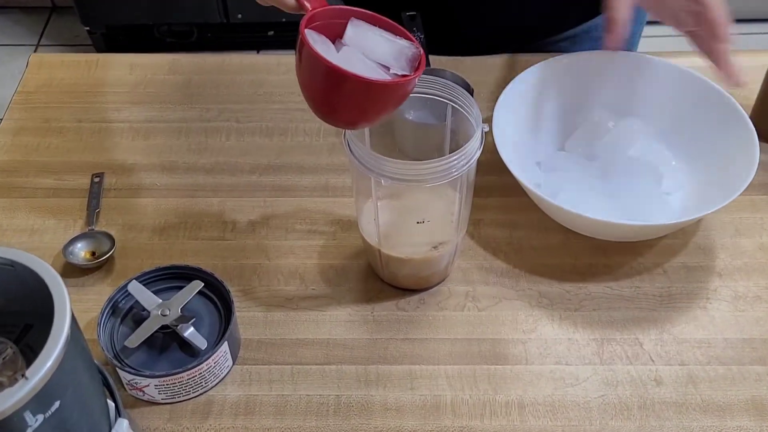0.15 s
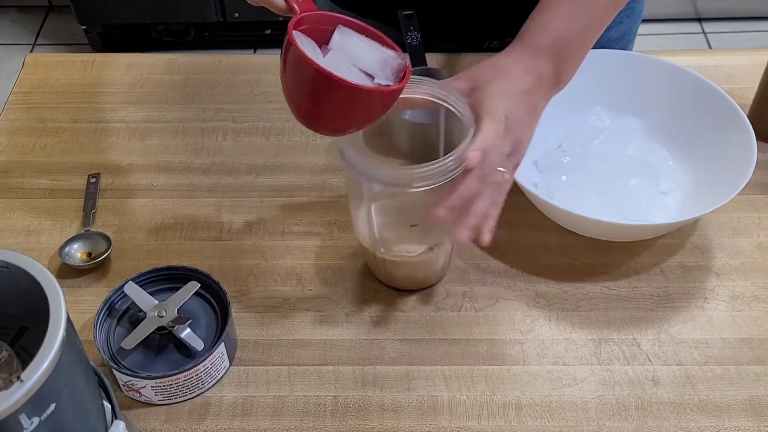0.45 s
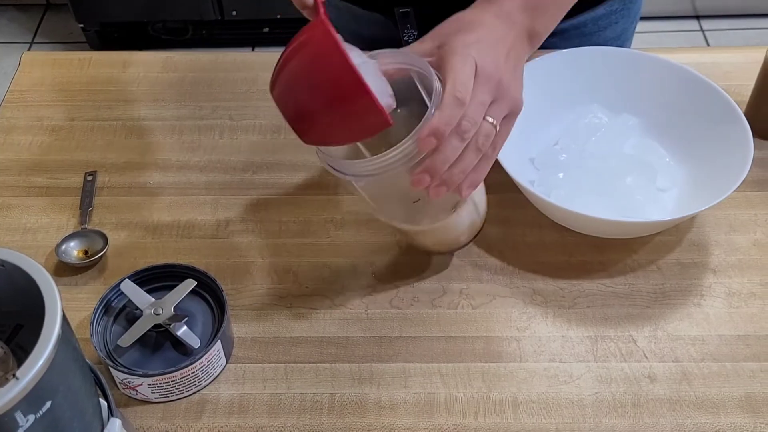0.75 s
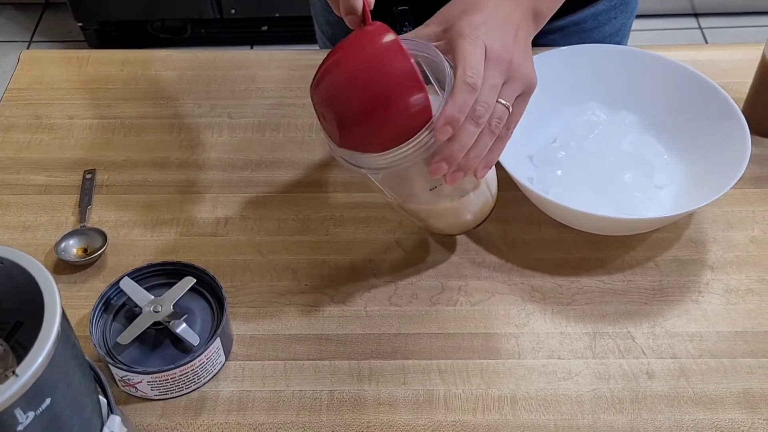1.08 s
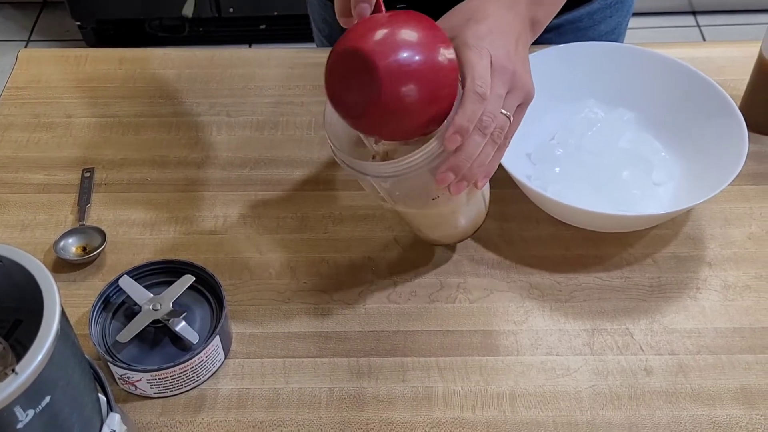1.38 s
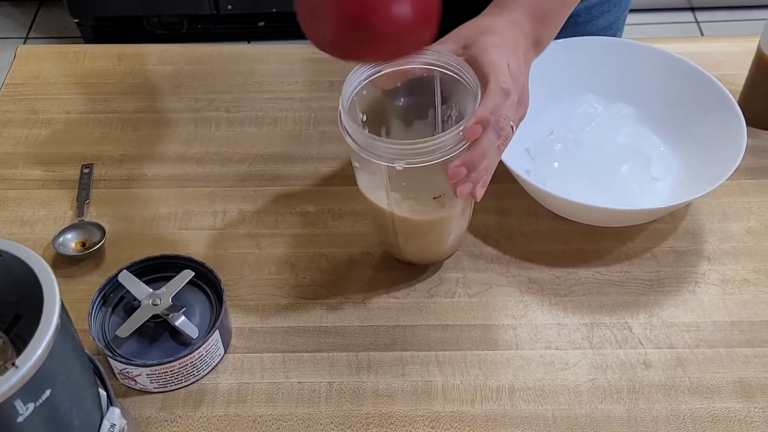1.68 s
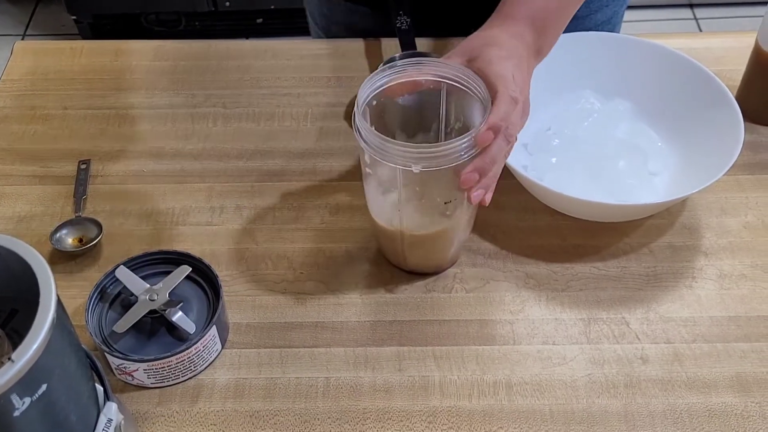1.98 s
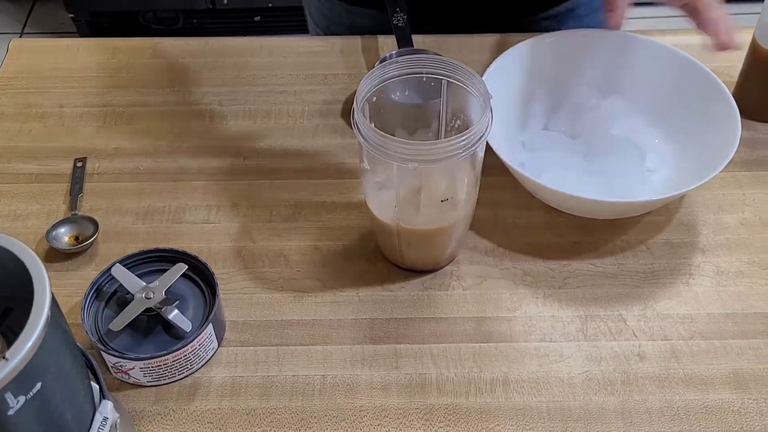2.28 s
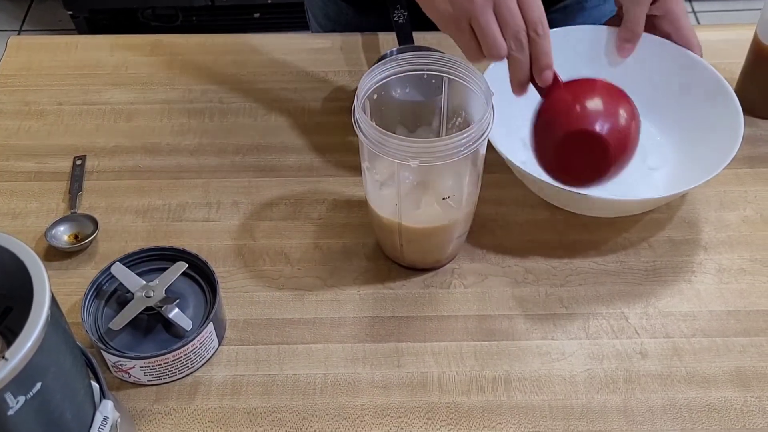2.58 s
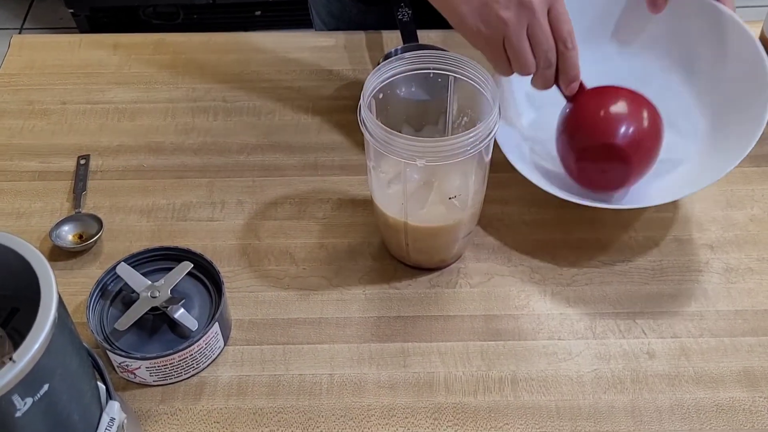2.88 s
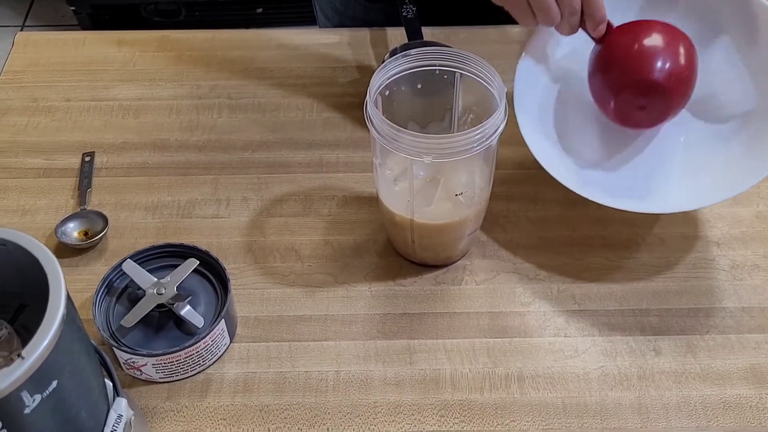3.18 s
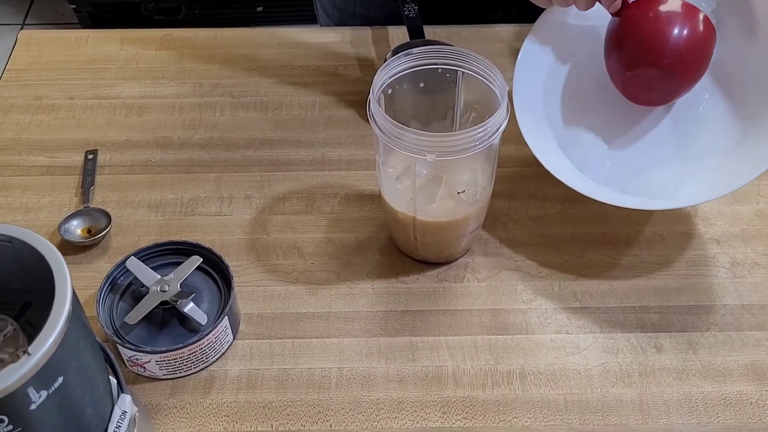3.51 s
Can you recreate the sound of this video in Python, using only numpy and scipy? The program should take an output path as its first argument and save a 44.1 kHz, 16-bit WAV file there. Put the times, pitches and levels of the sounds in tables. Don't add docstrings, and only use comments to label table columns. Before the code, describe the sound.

Ice cubes rattle in a kitchen. A soft counter bump with a faint spoon ring opens, then a low drag around 0.4 s. From 0.9 to 1.5 s cubes tumble into a plastic jug with hollow, rising resonance. The jug thumps on wood at 1.9 s. From 2.6 s a cup clacks and digs through a bowl of ice, crackling densely until 3.5 s, over faint fridge hum.

```python
import sys
import numpy as np
from scipy import signal
from scipy.fft import rfft, irfft
from scipy.io import wavfile
from scipy.ndimage import uniform_filter1d

SR = 44100
rng = np.random.default_rng(int(sys.argv[2]) if len(sys.argv) > 2 else 0)


def generate_wav(signal):
    frames = np.transpose(np.atleast_2d(signal))
    scaled = np.clip(frames, -1, 1) * 32767
    pcm = np.round(scaled).astype(np.int16)
    wavfile.write(sys.argv[1], SR, pcm)


def volts(x):
    e = np.asarray(x, float) / 20
    return 10 ** e


N = 160965


def evened(x):
    return x / np.sqrt(np.mean(x ** 2) + 1e-20)


def unit(x):
    return x / np.linalg.norm(x)


def read(points, hz):
    f, value = np.transpose(points)
    return np.interp(np.log(hz + 1), np.log(f + 1), value)


def fader(s, db):
    return volts(np.interp(np.arange(N) / SR, s, db, -120, -120))


def slips(per_s):
    return rng.standard_normal(N) * (rng.random(N) < per_s / SR)


def colour(x, points, size=2048):
    log_gain = np.log(volts(read(points, abs(np.fft.fftfreq(size, 1 / SR)))))
    minimum_phase = np.exp(np.conj(signal.hilbert(log_gain)))
    taps = np.fft.ifft(minimum_phase).real[:size // 2]
    return signal.oaconvolve(x, unit(taps))[:len(x)]


def ring(x, hz, width_hz):
    turn = np.exp(2j * np.pi * np.cumsum(hz * np.ones(len(x))) / SR)
    r = np.exp(-np.pi * width_hz / SR)
    envelope = signal.lfilter([1], [1, -r], x / turn + 1e-18)
    return np.sqrt(2 * (1 - r * r)) * (turn * envelope).imag


def modes(table, t, ratio=1):
    return sum(volts(db - 60 * t / t60) * np.sin(2 * np.pi * hz * ratio * t) for hz, db, t60 in table)


def add(mix, s, sound):
    part = mix[round(s * SR):][:len(sound)]
    part += sound[:len(part)]


def stir_grains(stir):
    contacts_per_s, spread_db, grain_s = 500, 5, 0.001
    t = np.arange(N) / SR
    s, level_db = np.transpose(stir)
    on = (t > s[0]) & (t < s[-1])
    strength = volts(spread_db * np.minimum(rng.exponential(1, (3, N)), 4))
    clicks = on * strength * (rng.random((3, N)) < contacts_per_s / SR)
    decay = np.exp(-np.arange(200)[None] / SR / grain_s)
    small = signal.oaconvolve(clicks, decay)[:, :N] * rng.standard_normal((3, N))
    return small / np.sqrt(np.mean(small[:, on] ** 2)) * volts(np.interp(t, s, level_db))


# (frequency [Hz], level [dB])
SNAP_TONE = [(3000, -26), (4800, -2), (5600, -10), (6300, 0.5), (7300, 1.5), (8500, -12), (10400, -14.5),
             (12000, -12.5), (15600, -27), (16500, -69.5)]
# (frequency [Hz], level [dB])
KNOCK_TONE = [(600, 10.5), (1500, -3.5), (2500, 9), (4200, 12), (5500, -14.5), (8000, -25)]


def ice(events, stir, hollow, rim):
    snap_s, settle_s, settle_db, strike_db = 0.0035, 0.013, -11, 11
    ring_db, ring_width_hz, ice_db, ice_width_hz = 0.5, 270, -5, 260
    hollow_db, rim_db, wander, thin_hz = -7, -8.5, 0.05, 620
    stir_hollow_db, stir_crack_db, cube_db, hop_samples = -1, 2, 4, 700

    low, mid, high = stir_grains(stir) * volts([[stir_hollow_db], [0], [stir_crack_db]])
    pitches = np.exp(rng.uniform(np.log(900), np.log(8000), N // 500))
    rings = volts(cube_db) * ring(mid, np.repeat(pitches, hop_samples)[:N], ring_width_hz)

    short = np.arange(2000) / SR
    contact = np.exp(-short / snap_s) + volts(settle_db) * np.exp(-short / settle_s)
    contact[:4] *= volts(strike_db)
    chatter = rng.standard_normal((len(events), 3, len(short)))
    tones = rng.uniform(5830, 7770, (len(events), 3))
    for (at, db, hz, body_db, crack_db), noise, ice_hz in zip(events, chatter, tones):
        body, knock, crack = (volts(db + 13.5) * unit(n * contact) for n in noise)
        add(low, at, volts(body_db) * body)
        add(mid, at, knock)
        add(high, at, volts(crack_db) * crack)
        plastic_ring = volts(ring_db) * ring(knock, hz, ring_width_hz)
        ice_ring = volts(ice_db + crack_db) * sum(ring(crack, f, ice_width_hz) for f in ice_hz)
        add(rings, at, plastic_ring + ice_ring)

    drift = 1 + wander * evened(uniform_filter1d(rng.standard_normal((len(hollow), N)), size=2500))
    walls = sum(volts(db) * ring(low, hz * d, width) for (hz, width, db), d in zip(hollow, drift))
    edge = sum(volts(db) * ring(mid, hz, width) for hz, width, db in rim)
    vessel = volts(hollow_db) * walls + volts(rim_db) * edge
    thin = signal.butter(4, thin_hz, "high", fs=SR, output="sos")
    return signal.sosfilt(thin, vessel + rings + colour(mid, KNOCK_TONE) + colour(high, SNAP_TONE))


# (time [s], knock level [dB], ring pitch [Hz], hollow re knock [dB], crack re knock [dB])
POUR_HITS = [(0.7906, -57, 2330, 17.5, 7), (0.8647, -49.5, 1460, 5.5, 10.5), (0.887, -48, 2310, -3.5, 7.5),
             (0.9195, -27, 2500, -2.5, 3), (0.928, -31.5, 1300, -9, 3.5), (0.9507, -27, 2610, 2.5, -1.5),
             (1.0329, -26, 4970, 11.5, 0), (1.0777, -19, 2650, 2, -10), (1.002, -36, 3270, 7, 1.5),
             (1.1128, -19.5, 3830, 2, 2), (1.1353, -33.5, 4480, -11.5, 14.5),
             (1.1972, -23.5, 3530, -20, -6), (1.151, -25, 1160, 3, -2), (1.2223, -23.5, 1140, 12.5, -3.5),
             (1.2354, -12, 3130, -1, -1), (1.2522, -22, 3550, 5, -23), (1.2824, -20, 1100, 11, -11),
             (1.266, -22, 2100, 0.5, 2), (1.333, -23.5, 2070, -4, -10), (1.3163, -32.5, 2030, -2, -0.5),
             (1.3528, -27, 3700, 4.5, -15), (1.4007, -26.5, 2070, 6.5, -11.5),
             (1.412, -23, 2030, 12.5, -23), (1.458, -34.5, 4500, -17, 2), (1.4459, -26, 4230, -14, -16.5),
             (1.5014, -43, 2230, 12.5, -9)]
TICKS = [
    (0.387, -51.5, 990, 11, -10),
    (0.629, -58.5, 2550, -18, 5),
    (2.263, -50.5, 2340, 1.5, -11.5),
    (2.344, -52.5, 2330, 10, -12.5),
    (2.41, -60, 2380, 6, -14),
    (1.7563, -45.5, 3070, -3, -23),
    (1.802, -38.5, 3080, 3.5, -44.5),
    (1.8794, -40, 2570, 2.5, -9.5),
    (2.4933, -53.5, 3020, 12, -4),
    (2.546, -65, 2090, 22, 11.5),
]
# (time [s], level [dB])
POUR_STIR = [(.76, -66), (.87, -66), (1.1, -50), (1.27, -41.5), (1.43, -53.5), (1.55, -88)]
# (frequency [Hz], width [Hz], level [dB])
JUG_WALLS = [(828, 76, -1), (1169.6, 14, -3), (1246, 160, -3.5)]
# (frequency [Hz], width [Hz], level [dB])
JUG_RIM = [(2160, 210, 2)]


def pour():
    return ice(POUR_HITS + TICKS, POUR_STIR, JUG_WALLS, JUG_RIM)


# (time [s], knock level [dB], ring pitch [Hz], hollow re knock [dB], crack re knock [dB])
SCOOP_HITS = [(2.6444, -18.5, 1437, -8, 2), (2.7626, -15, 3780, -0.5, -2.5),
              (2.774, -16.5, 4960, 2.5, -2.5), (2.8104, -15.5, 1822, -1.5, -11),
              (2.818, -19, 3950, -0.5, -13.5), (2.8838, -13.5, 1786, -9, 0.5),
              (2.9061, -16, 4020, -33.5, -28.5), (2.9472, -17, 1620, -3, 2), (2.891, -28, 1780, 7.5, -8),
              (2.975, -23, 900, 8, -17), (2.99, -22, 3760, -0.5, -5), (3.023, -17, 3160, -8, -7.5),
              (3.059, -17.5, 4140, -21, -7), (3.1018, -19, 3860, -11, -6.5),
              (3.1415, -15.5, 2246, -17.5, -12), (3.1647, -18.5, 2130, -13.5, -12),
              (3.1845, -12.5, 2350, 1, -7), (3.192, -19, 1010, -4.5, -3.5), (3.2228, -23, 2130, -7, -11.5),
              (3.2375, -16.5, 4140, -6.5, 0), (3.246, -17, 2240, -15, -3), (3.286, -20, 900, -3.5, -8),
              (3.303, -35, 4070, -6, 1), (3.2784, -15.5, 2570, 4, 0), (3.3134, -16.5, 3950, -18, -4),
              (3.3324, -26, 2160, 3.5, 19), (3.3514, -14, 2300, -2, 2), (3.36, -13.5, 2400, 0.5, -16),
              (3.3787, -16.5, 3860, -19.5, 4.5), (3.388, -18.5, 3830, 4, 3), (3.397, -15.5, 2430, -23, -9),
              (3.418, -25, 4200, -2.5, 0), (3.4674, -24.5, 2260, 9.5, 0.5), (3.6125, -26.5, 2320, -4, -12),
              (3.619, -26, 2300, -25.5, -27), (3.6274, -28, 2330, 4.5, 0)]
# (time [s], level [dB])
SCOOP_STIR = [(2.76, -43.5), (2.97, -43), (3.1, -48.5), (3.379, -48), (3.47, -56.5), (3.58, -61)]
# (frequency [Hz], width [Hz], level [dB])
BOWL_WALLS = [(768, 27, -0.5), (886, 32.4, 6), (1070, 94, 0.5), (1260, 70, 0)]
# (frequency [Hz], width [Hz], level [dB])
BOWL_RIM = [(2224, 200, 0), (4050, 600, -9)]


def scoop():
    return ice(SCOOP_HITS, SCOOP_STIR, BOWL_WALLS, BOWL_RIM)


# (time [s], pitch [Hz], level [dB])
JUG_AIR = [(.92, 530, -50), (1.065, 520, -52), (1.08, 505, -34), (1.202, 510, -38), (1.28, 565, -33),
           (1.36, 595, -42), (1.438, 630, -38), (1.519, 615, -55)]


def jug_air():
    s, hz, db = np.transpose(JUG_AIR)
    hz = np.interp(np.arange(N) / SR, s, hz)
    air = ring(ring(slips(300), hz, 30), hz, 136)
    power = abs(uniform_filter1d(air ** 2, size=3000))
    air = air / np.sqrt(power + 0.1 * np.mean(air ** 2))
    return air * fader(s, db)


# (time [s], level [dB])
SLIDE = [(.775, -73), (0.793, -47), (.83, -68.5), (.872, -45), (.9, -53), (.93, -52.5), (1.001, -36)]


def slide():
    wall_hz, width_hz = 1265, 57
    return evened(ring(slips(400), wall_hz, width_hz)) * fader(*np.transpose(SLIDE))


# (time [s], level [dB], sharpness [dB], pitch ratio [1])
BLOWS = [
    (.002, -24.5, -4.5, 1.32),
    (.03, -25, -8, .9),
    (1.919, -5.5, -4.5, 0.88),
    (1.940, -14.5, -12, 0.67),
    (1.964, -25, 7, .9),
    (2.568, -18.5, -13.5, 1.4),
    (2.603, -19, -22.5, 1.034),
    (2.644, -18.5, -3, 0.972),
    (2.677, -30, -22, 0.88),
]
# (frequency [Hz], level [dB], t60 [s])
COUNTER = [(117.4, 2, 0.13), (163, 2, 0.025), (248.4, 8, 0.034), (284.6, 21, 0.04), (402.3, 6, 0.097),
           (554, 7.5, 0.032), (705, 13, 0.029), (812.7, -6.5, 0.12)]
# (frequency [Hz], level [dB])
SLAP_TONE = [(30, -14.5), (250, 0), (800, -6.5), (1600, -16.5), (7500, -36), (8900, -30), (9300, -59)]


def counter_blows():
    slap_db, slap_s, rise_s = -2.5, 0.016, 0.0044
    t, out = np.arange(SR // 2) / SR, np.zeros(N)
    for s, db, sharp_db, ratio in BLOWS:
        wood = -modes(COUNTER, t, ratio) * np.minimum(t / rise_s, 1)
        slap = colour(rng.standard_normal(len(t)), SLAP_TONE) * np.exp(-t / slap_s)
        add(out, s, volts(db) * (wood / abs(wood).max() + volts(slap_db + sharp_db) * slap))
    return out


# (frequency [Hz], level [dB], t60 [s])
CUP = [(950, -30, .04), (1450, -18, 0.035), (2070, -22, .04), (2700, -31, 0.08)]


def cup_clack():
    out = np.zeros(N)
    add(out, SCOOP_HITS[0][0], modes(CUP, np.arange(SR // 2) / SR))
    return out


# (time [s], level [dB])
DRAG = [(0.27, -60), (.34, -42.5), (.39, -37), (0.511, -48), (.6, -101), (2.72, -101), (2.77, -39),
        (2.95, -58), (3.1, -58), (3.3, -53), (3.5, -66)]
# (frequency [Hz], level [dB])
DRAG_TONE = [(30, -11), (110, -6), (280, 2.5), (400, -7), (1050, -30.5), (9000, -62)]


def drag():
    drone_hz, drone_width_hz, drone_db = 161.3, 32, -1.5
    grip = slips(900)
    drone = volts(drone_db) * evened(ring(grip, drone_hz, drone_width_hz))
    drone *= np.arange(N) < SR
    return (evened(colour(grip, DRAG_TONE)) + drone) * fader(*np.transpose(DRAG))


# (frequency [Hz], level [dB], t60 [s])
SPOON = [(8050, -43, .2), (8850, -44, .3), (11900, -44, .42), (11990, -50, .25), (13360, -50, .2)]


def spoon():
    t, out = np.arange(SR // 2) / SR, np.zeros(N)
    add(out, BLOWS[1][0] + 0.0031, np.minimum(t / 0.015, 1) * modes(SPOON, t))
    return out


# (time [s], level [dB])
HEAVE = [(2.5, -59), (2.6, -47), (2.7, -42), (2.8, -58), (2.92, -75)]


def heave():
    sway = ring(ring(rng.standard_normal(N), 50, 40), 55, 40)
    return evened(sway) * fader(*np.transpose(HEAVE))


# (frequency [Hz], left re right [dB])
POUR_PORTS = [(200, 0.5), (1600, -1), (4500, -3.5), (9000, -12), (13000, 3)]
# (frequency [Hz], left re right [dB])
SCOOP_PORTS = [(200, -3.5), (1600, 0.5), (4500, -6), (9000, -15.5), (13000, -2.5)]


def ports(x, balance, lag):
    in_step_hz = 9500
    hz = np.fft.rfftfreq(N, 1 / SR)
    lag = lag / (1 + (hz / in_step_hz) ** 8)
    half = volts(read(balance, hz) / 2) * np.exp(-1j * np.pi * hz * lag / SR)
    return irfft(rfft(x) * np.array([half, 1 / half]), N)


# (frequency [Hz], share [1])
ROOM_LIKENESS = [(100, 0.88), (400, 0.8), (1000, 0.063), (3000, 0.015)]


def pair(a, b, hz):
    same = np.clip(read(ROOM_LIKENESS, hz), 0, 1)[:, None]
    return np.array([a, same * a + np.sqrt(1 - same ** 2) * b])


# (frequency [Hz], t60 [s])
KITCHEN_DECAY = [(100, 0.25), (500, 0.51), (2000, 0.56), (6000, 0.41), (14000, 0.22)]
# (frequency [Hz], level [dB])
KITCHEN_TONE = [(250, -4), (900, -4), (5000, -2.5)]


def kitchen(x):
    taps = np.zeros((2, SR))
    at = np.arange(160, SR - 20, 20) + rng.integers(0, 20, (2, (SR - 161) // 20))
    np.put_along_axis(taps, at, rng.choice([-1., 1.], at.shape), 1)
    hz, t, z = signal.stft(taps, SR, nperseg=256)
    decay_db = -60 * t / read(KITCHEN_DECAY, hz)[:, None]
    z = pair(*z, hz) * volts(read(KITCHEN_TONE, hz)[:, None] + decay_db)
    tail = signal.istft(z, SR, nperseg=256)[1]
    return signal.fftconvolve(x, tail / np.linalg.norm(tail[0]), axes=1)[:, :N]


# (frequency [Hz], level [dB])
FLOOR_TONE = [(20, 5), (55, -9.5), (250, 2), (700, -15), (2200, -19), (5200, -27), (7200, -25.5),
              (10500, -39), (16000, -48)]


def room_tone():
    floor_db, hum_hz, hum_width_hz, hum_db = -57, 111.3, 3.4, -68.5
    hz = np.fft.rfftfreq(2048, 1 / SR)
    a, b, c, d = rng.standard_normal((N // 512 + 5, 1025, 4)).T
    z = pair(a + 1j * b, c + 1j * d, hz) * volts(read(FLOOR_TONE, hz))[:, None]
    floor = signal.istft(z, nperseg=2048, noverlap=1536)[1][:, :N]
    hum = volts(hum_db) * evened(ring(rng.standard_normal(N), hum_hz, hum_width_hz))
    return volts(floor_db) * evened(floor) + hum


def scene():
    wet_db, turn_hz = -2.5, 2
    jug_side = pour() + jug_air() + slide() + counter_blows() + cup_clack() + drag()
    near = ports(jug_side, POUR_PORTS, 1.0) + ports(scoop(), SCOOP_PORTS, 4.3)
    turn = 2 * np.pi * turn_hz * np.arange(N) / SR
    wet = kitchen(near * np.cos(turn)) + kitchen(near * np.sin(turn))
    return near + volts(wet_db) * wet + room_tone() + spoon() + heave()


def low_pass(x):
    return signal.sosfilt(signal.butter(12, 16820, fs=SR, output="sos"), x)


def record(dry):
    cut = signal.butter(2, 45, "high", fs=SR, output="sos")
    return low_pass(np.tanh(signal.sosfilt(cut, dry)))


dry = scene()
out = record(dry)
generate_wav(out)
```